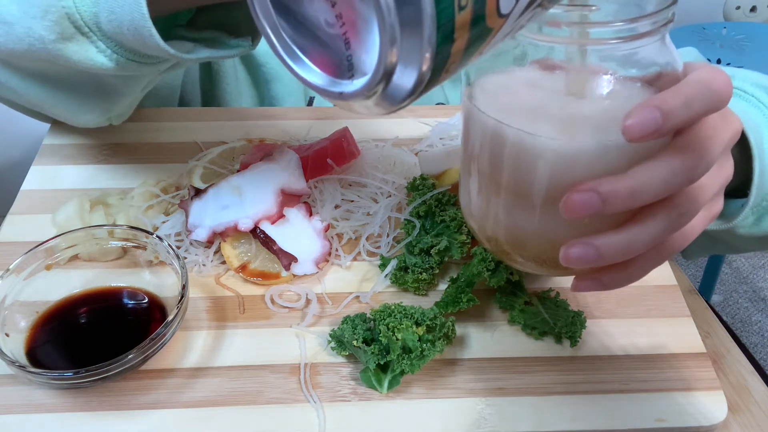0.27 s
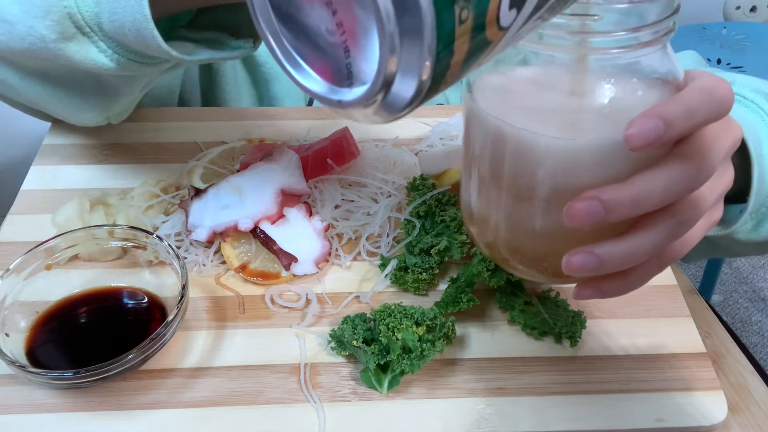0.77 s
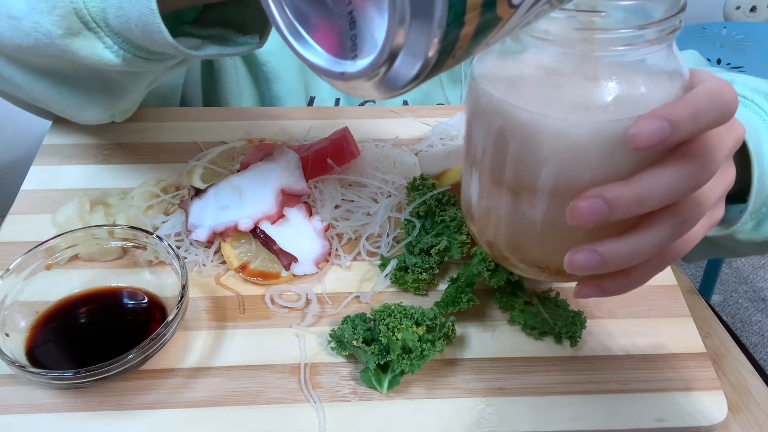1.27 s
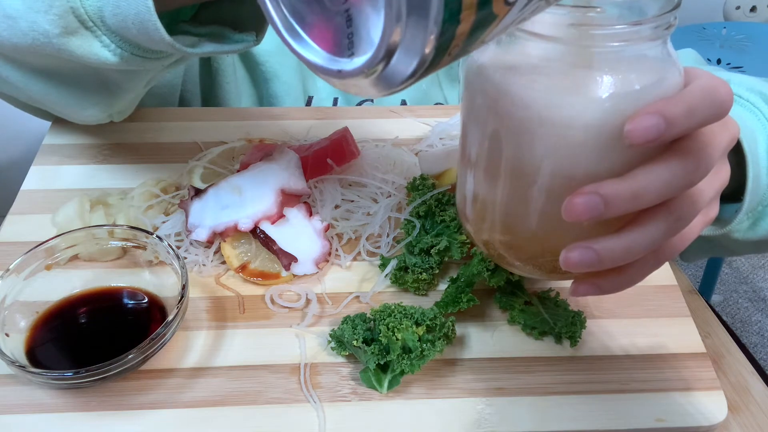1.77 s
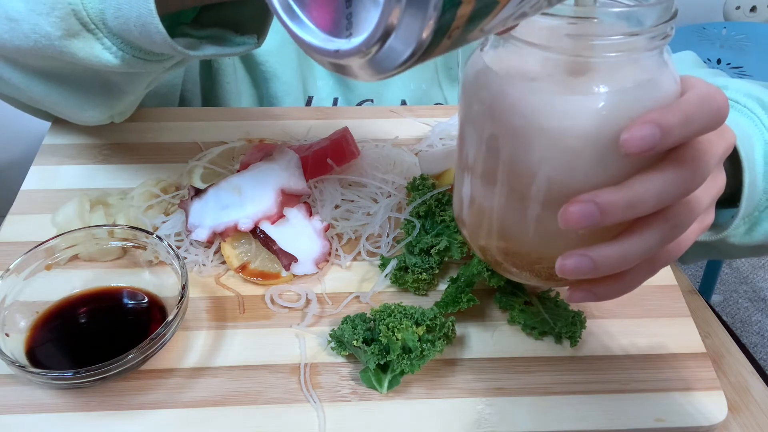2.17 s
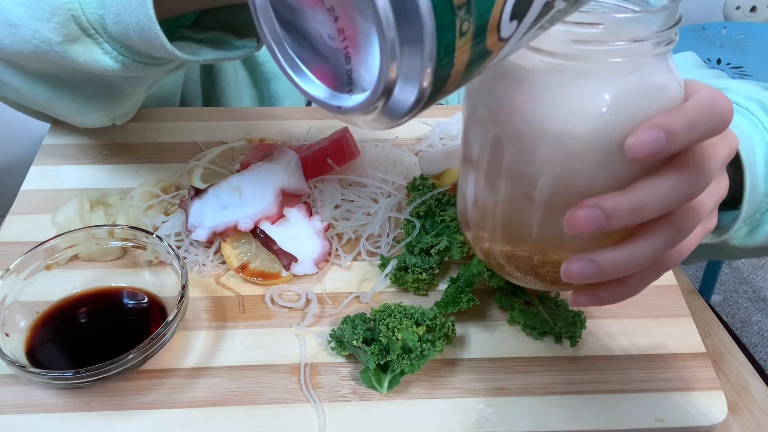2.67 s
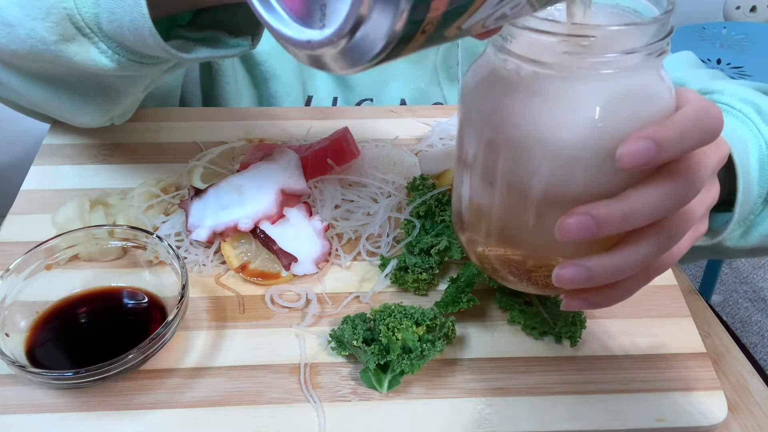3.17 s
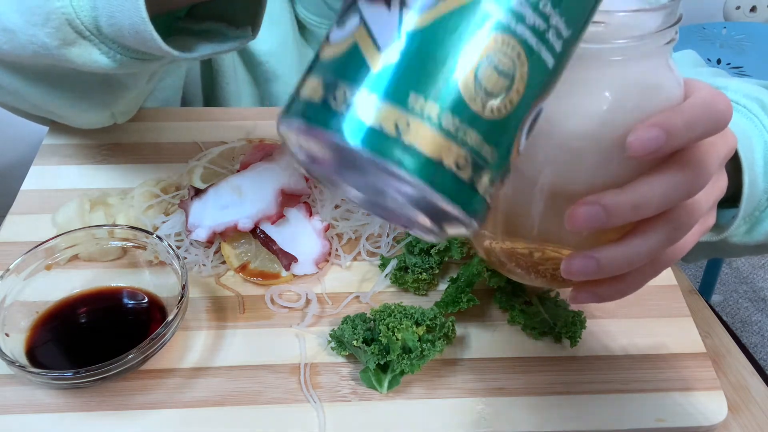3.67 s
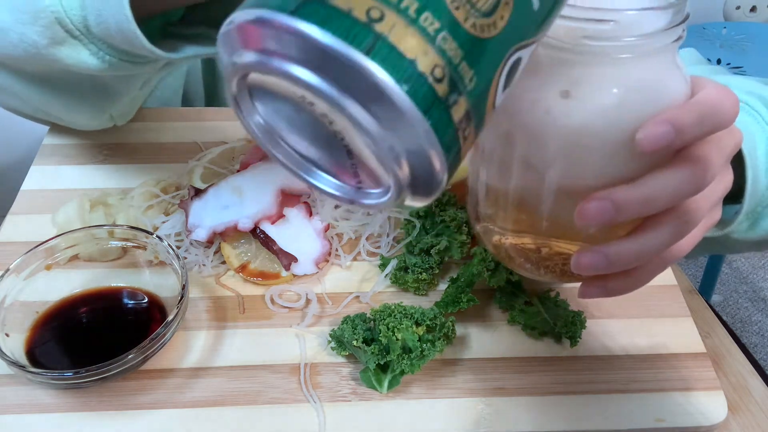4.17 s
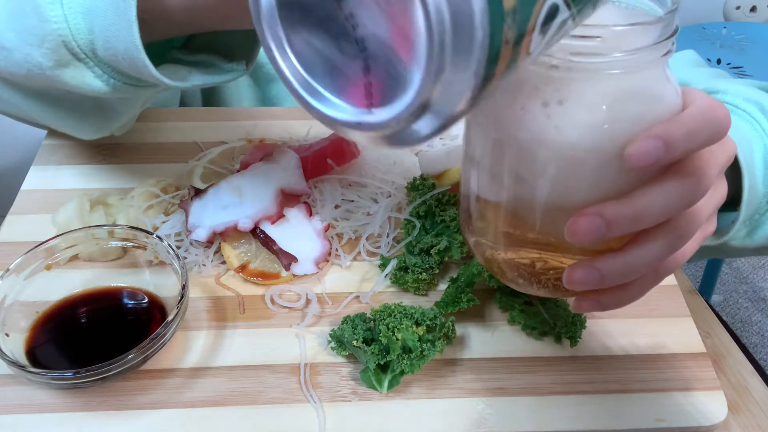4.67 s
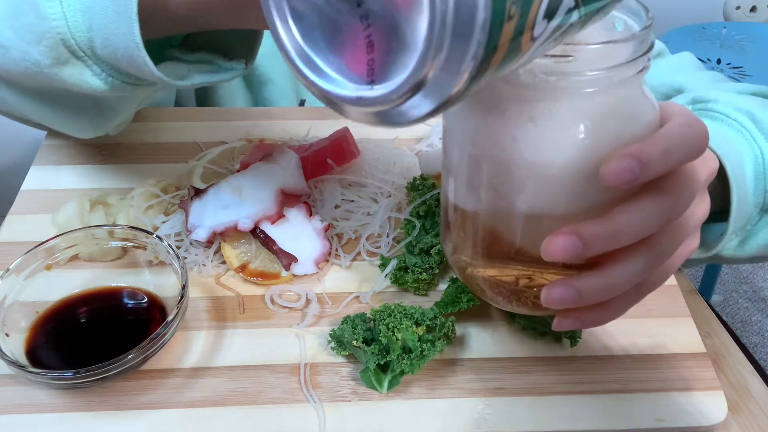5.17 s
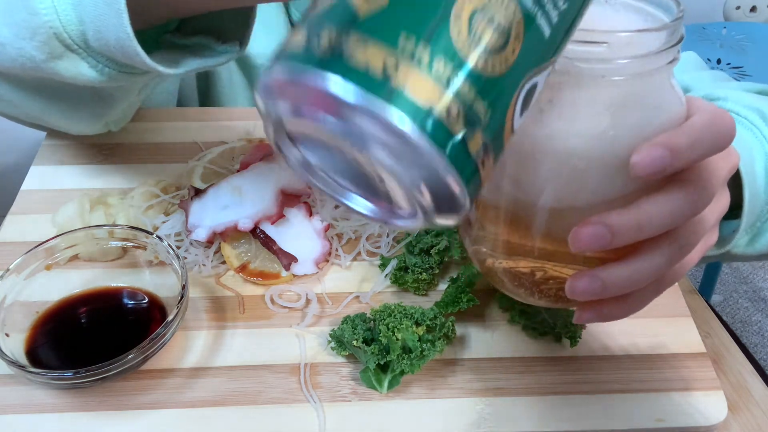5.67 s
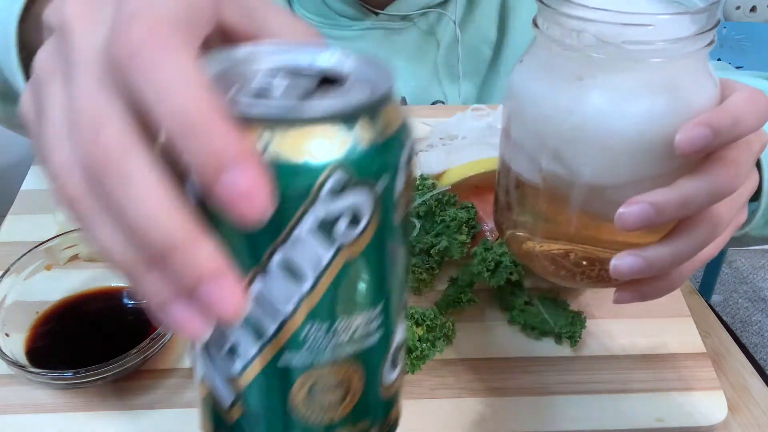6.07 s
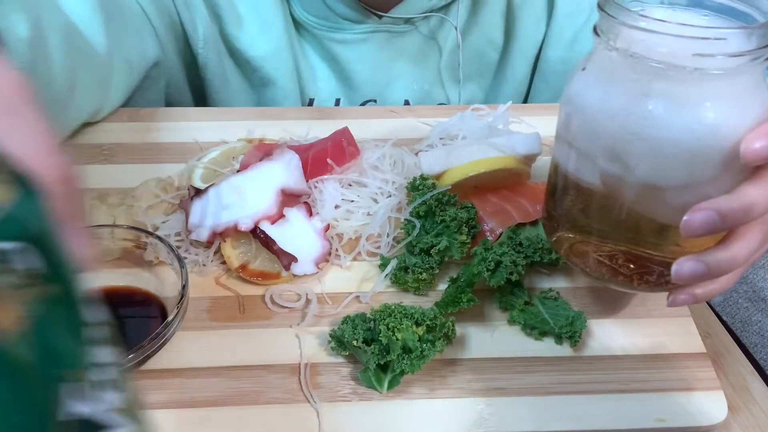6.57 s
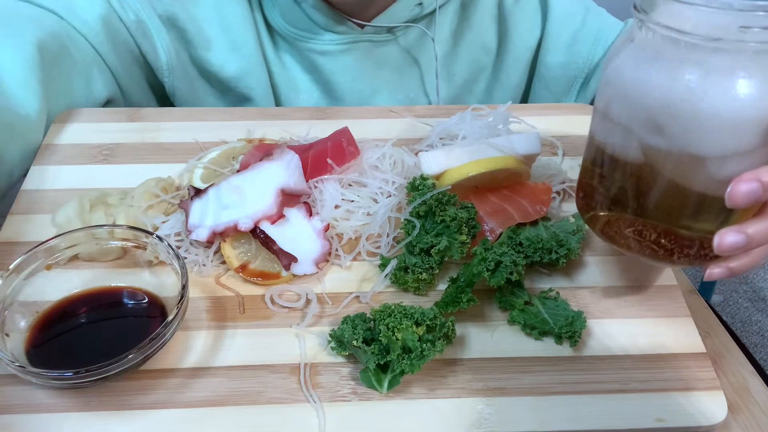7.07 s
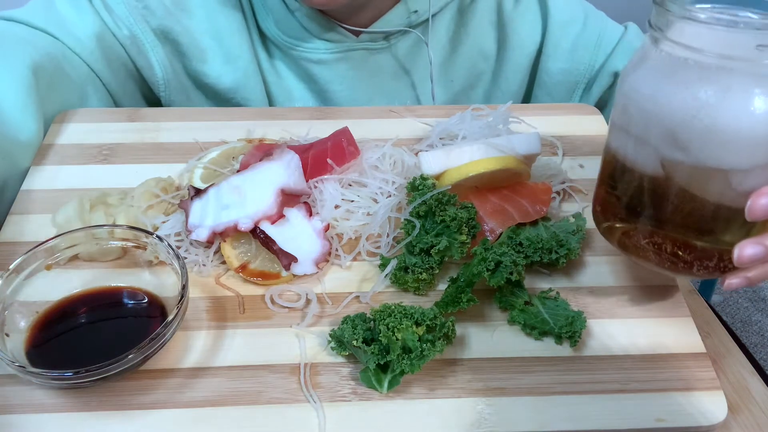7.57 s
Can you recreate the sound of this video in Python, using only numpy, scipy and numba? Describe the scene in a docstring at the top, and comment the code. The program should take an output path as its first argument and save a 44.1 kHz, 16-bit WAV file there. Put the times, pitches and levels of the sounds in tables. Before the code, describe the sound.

A fizzy drink is already pouring from a can into a glass jar, heard close up in a small, quiet room. For the first 2.5 seconds, big bubbles plop and ice clinks lightly against the glass, while the splashing stream rises steadily in pitch. A soft, prickly fizz runs throughout, growing mellower as foam builds. The can bumps dully against the jar at about 2.5 and 3.1 seconds, with a few small drips, and the stream thins out. At about 4.3 seconds the can is tipped again, giving a quick cluster of hollow glugs, soft bumps and thin metal ticks, then two weaker glugs near 4.9 seconds. Faint drips, ticks and one small ice tap follow before 6 seconds. The foam keeps fizzing gently until, at about 7.7 seconds, the can is set down on the table with a loud, low thud.

```python
"""Fizzy drink over ice

A can is poured into a glass jar close by. Big bubbles plop and ice clinks while the air above the
rising foam rings higher and higher; the foam fizzes on. The can glugs when it is tipped a second
time, and is finally set down on the table with a thud."""
import sys
import numpy as np
from scipy import signal
from scipy.fft import rfft, irfft, next_fast_len
from scipy.io import wavfile
from scipy.ndimage import uniform_filter1d
from numba import njit

SR = 44100
rng = np.random.default_rng(int(sys.argv[2]) if len(sys.argv) > 2 else 0)


def output_pcm(signal):
    """Save a mono or channel-first signal as 16-bit PCM at the path in sys.argv[1].

    Samples are clipped to [-1, 1] before scaling.
    """
    pcm = np.clip(np.atleast_2d(signal).T, -1, 1) * 32767
    wavfile.write(sys.argv[1], SR, np.round(pcm).astype(np.int16))


N = 345744
TIME = np.arange(N) / SR
AGE = TIME[:SR // 2]   # seconds into a one-shot


def from_db(db):
    """Decibels to gain."""
    return 10 ** (np.asarray(db) / 20)


def rms_one(x):
    """Scale to unit power."""
    return x / np.sqrt(np.mean(x ** 2) + 1e-20)


def automation(rows):
    """Breakpoints to one curve per column, at every sample."""
    times, *columns = np.transpose(rows)
    return [np.interp(TIME, times, column) for column in columns]


def butter(x, hz, kind, order=2):
    """Causal Butterworth filter."""
    return signal.sosfilt(signal.butter(order, np.clip(hz, 10, .45 * SR), kind, fs=SR, output="sos"), x)


def eq(x, curve):
    """Shape a sound with a curve of (f/Hz, gain/dB) points."""
    hz, db = np.transpose(curve)
    size = next_fast_len(N)
    bins = np.maximum(np.arange(size // 2 + 1) * SR / size, 1)
    gain = from_db(np.interp(np.log(bins), np.log(hz), db))
    return irfft(rfft(x, size) * gain, size)[:N]


def drift(per_s):
    """A random modulator of unit power."""
    knots = rng.standard_normal(8000)
    return rms_one(np.interp(TIME * per_s, np.arange(len(knots)), knots))


def grains(per_s, spread_db):
    """Random clicks, many small and a few large."""
    born = rng.random(N) < per_s / SR
    sizes = from_db(spread_db * np.minimum(rng.exponential(1, N), 5))
    return rms_one(born * sizes * rng.choice([-1, 1], N))


def envelope(attack, t60):
    """A smooth rise, then an exponential tail; both times in seconds."""
    rise = np.sin(np.pi / 2 * np.minimum(AGE / attack, 1)) ** 2
    return rise * np.exp(-np.log(1000) * np.maximum(AGE - attack, 0) / t60)


def ring(hz, t60, attack):
    """One struck mode: a decaying sine."""
    return envelope(attack, t60) * np.sin(2 * np.pi * hz * AGE)


def add(track, t, sound):
    """Mix a one-shot into a track at t seconds."""
    at = int(np.clip(round(t * SR), 0, N - 1))
    track[at:at + len(sound)] += sound[:N - at]


@njit
def resonate(x, hz, width):
    """A swept resonator that keeps the power of white noise."""
    out = np.zeros(len(x))
    for i in range(2, len(x)):
        r = np.exp(-np.pi * width[i] / SR)
        drive = np.sqrt((1 - r * r) / 2) * (x[i] - x[i - 2])
        out[i] = drive + 2 * r * np.cos(2 * np.pi * hz[i] / SR) * out[i - 1] - r * r * out[i - 2]
    return out


def air_ring(x, hz, width_hz, skirt):
    """Enclosed air resonating; a second pass, skirt times wider, steepens the flanks."""
    width = width_hz * np.ones(N)
    return rms_one(resonate(resonate(x, hz, width), hz, skirt * width))


# Room tone EQ: f/Hz, gain/dB
RUMBLE_EQ = [(20, -12), (40, -5), (56, 6.5), (80, -8), (125, -0.5), (200, 0), (400, -8), (1000, -4.5),
             (4000, -41)]


def rumble():
    """A faint bed of low room noise."""
    return from_db(-63) * rms_one(eq(rng.standard_normal(N), RUMBLE_EQ))


def reverb(x, t60=0.14, predelay_s=.007, dull_hz=2600):
    """Scattered, dulled echoes from the table top and the walls of a small, soft room."""
    echoes = rng.standard_normal(len(AGE)) * np.exp(-np.log(1000) * AGE / t60) * (AGE > predelay_s)
    wet = signal.fftconvolve(x, echoes / np.linalg.norm(echoes))[:N]
    return butter(wet, dull_hz, "low", order=1)


def prickle(pitches=24, t60_cycles=70):
    """The tiniest bubbles ping out of the fizz one by one."""
    out = np.zeros(N)
    for hz in np.geomspace(5000, 15200, pitches):
        r = from_db(-60 * hz / (t60_cycles * SR))
        poles = [1, -2 * r * np.cos(2 * np.pi * hz / SR), r * r]
        pings = signal.lfilter([1], poles, grains(per_s=12, spread_db=3) + 1e-18)
        out += hz * rms_one(pings)
    return rms_one(out)


# Hiss of bursting bubbles: t/s, level/dB
FIZZ_LEVEL = [(0.0, -51), (0.37, -50.5), (0.59, -53.5), (1.09, -53.5), (1.46, -50), (2.53, -48.5),
              (4.11, -52.5), (4.65, -49.5), (5.31, -51), (5.59, -49), (6.09, -52.5), (6.7, -53),
              (7.21, -56), (7.84, -55.5)]
# Crossfade from open liquid to a head of foam: t/s, foam share/0-1
FOAM_SHARE = [(0, 0), (1.5, 0.24), (2.6, 0.11), (3.2, 0.64), (3.8, 0.98), (7.84, 0.79)]
# EQs for fizz on open liquid, fizz in foam and the foam's low body: f/Hz, gain/dB
LIQUID_EQ = [(100, -5), (250, 0.5), (400, -7.5), (520, -3.5), (900, 3.5), (1800, -5), (2500, -1), (3150, 3),
             (3750, -1), (4300, 2), (5100, -1.5), (6800, -1), (7400, 0), (9300, -7.5), (15500, -14.5)]
FOAM_EQ = [(440, -22), (750, -20.5), (1080, -3.5), (1340, -9), (1780, -1.5), (2230, -2), (2500, -1.5),
           (2700, -3.5), (4260, -4.5), (5410, -9.5), (7070, -8), (10200, -20), (11600, -19), (15500, -26)]
BODY_EQ = [(100, -5.5), (260, -6), (400, -3.5), (520, -7.5), (700, -9.5), (900, -1), (1300, -38)]


def fizz(mean_spray_db=-59.5, spray_follows=0.71):
    """Thousands of tiny bursts a second, mellower under foam; the finest spray follows the hiss."""
    hiss_db, = automation(FIZZ_LEVEL)
    head, = automation(FOAM_SHARE)
    spray_db = mean_spray_db + spray_follows * (hiss_db - hiss_db.mean())
    bursts = grains(per_s=9000, spread_db=2.5) + .5 * rng.standard_normal(N) + 0.28 * prickle()
    bursts *= from_db(0.5 * drift(40))
    liquid, foam = eq(bursts, LIQUID_EQ), eq(bursts, FOAM_EQ)
    # equal treble level on both sides of the crossfade
    liquid, foam = [x / np.std(butter(x, [3800, 8000], "band", order=4)) for x in (liquid, foam)]
    blend = (1 - head) * liquid + head * foam
    spray = eq(blend, [(8000, -40), (9300, 0)])
    body = head * from_db(-12) * rms_one(eq(grains(per_s=2300, spread_db=3.5), BODY_EQ))
    return from_db(hiss_db) * (blend - spray + body) + from_db(spray_db) * rms_one(spray)


# Dull bumps of the can on the jar: t/s, level/dB
CAN_BUMPS = [(2.481, -33), (2.496, -40), (3.122, -29), (4.345, -35.5), (4.466, -33.5)]
# Metal ticking under the grip: t/s, level/dB
GRIP_TICKS = [(4.346, -32), (4.351, -38), (4.362, -47), (5.18, -46), (5.238, -48), (5.387, -46)]


def handling():
    """Soft bumps and thin metal ticks from the can in the hand."""
    out = np.zeros(N)
    bump = ring(196, t60=0.013, attack=0.0022) + 0.64 * ring(240, t60=0.0071, attack=0.001)
    for t, db in CAN_BUMPS:
        add(out, t, from_db(db) * bump)
    for t, db in GRIP_TICKS:
        tick = butter(rng.standard_normal(len(AGE)), [12200, 13700], "band") * np.exp(-AGE / .003)
        add(out, t, from_db(db + 3) * tick)
    return out


# The air inside the can: t/s, f/Hz, hum level/dB
CAN_AIR = [(0, 406, -67.5), (2.7, 392, -66.5), (3.25, 303, -63), (3.56, 398, -69), (3.8, 392, -77),
           (4.72, 386.6, -71), (4.83, 330, -69), (4.94, 335, -59), (5.12, 277, -70), (5.62, 418, -67),
           (6.4, 294, -86), (7.45, 243, -64.5)]


def can_hum():
    """The running drink stirs a faint hum in the hollow of the can."""
    hz, db = automation(CAN_AIR)
    return from_db(db) * air_ring(grains(per_s=600, spread_db=6), hz, width_hz=32, skirt=2.3)


# Air gulped into the can: t/s, level/dB, attack/s, t60/s, splash re gulp/dB
GULPS = [(4.347, -19, 0.013, 0.073, -1), (4.366, -12.5, 0.0089, 0.12, -15),
         (4.380, -17.5, 0.0052, 0.12, -22), (4.465, -23, 0.0048, 0.11, -13),
         (4.484, -28.5, 0.0039, 0.12, -24), (4.64, -49, 0.021, 0.17, -30),
         (4.859, -32.5, 0.0073, 0.067, -22), (4.908, -30.5, 0.0055, 0.11, -17.5)]
# The can's higher modes: f/Hz, level/dB, t60/s, attack/s
WALL_MODES = [(301, -3.5, 0.15, .02), (621, -6.5, .05, 0.011), (677, -10, 0.16, 0.019),
              (820, -14, 0.036, 0.013), (1005, -19, .11, 0.037), (1260, -36, .04, 0.01),
              (1660, -16.5, 0.026, 0.02), (2070, -23, .05, 0.014)]


def glugs():
    """Each gulp of air pumps up the ring of the can's hollow, and the drink slaps the wall."""
    splashes, pumped = np.zeros(N), np.zeros(N)
    wall = sum(from_db(db) * ring(hz, t60, attack) for hz, db, t60, attack in WALL_MODES)
    for t, db, attack, t60, splash_db in GULPS:
        slosh = butter(rng.standard_normal(len(AGE)), [450, 2000], "band")
        slap = from_db(-2.5) * slosh * envelope(attack=0.0066, t60=0.063)
        add(splashes, t, from_db(db + splash_db) * (wall + slap))
        add(pumped, t, from_db(db) * envelope(attack, t60))
    hollow_hz, _ = automation(CAN_AIR)
    return splashes + pumped * np.sin(2 * np.pi * np.cumsum(hollow_hz) / SR)


# The can touches down, rim first: t/s, level/dB
TOUCHDOWNS = [(7.6728, -12), (7.6746, 4), (7.6805, -9)]
# Table and can ringing together: f/Hz, level/dB, t60/s
THUD_MODES = [(104.8, -16, 0.22), (119, -34.5, 0.86), (139.7, -14.5, 0.12), (162, -12, 0.05),
              (191, -22.5, 0.18), (288.3, -23, 0.17), (420, -8, 0.034), (562, -6, 0.035), (684, -20, 0.03),
              (816, -20, 0.034), (980, -19, 0.039), (1390, -26, .03), (1704, -31, 0.033), (1810, -30, 0.02)]


def landing():
    """The can's base sets the table booming; the top radiates little below its first mode."""
    out = np.zeros(N)
    thud = sum(from_db(db) * ring(hz, t60, attack=0.59 / hz) for hz, db, t60 in THUD_MODES)
    for t, db in TOUCHDOWNS:
        add(out, t, from_db(db) * thud)
    return butter(out, 95, "high", order=4)


# Ice hitting the glass: t/s, contact/s, low ring/dB, middle ring/dB, high ring/dB
ICE_HITS = [(0.7475, 0.0016, -23, -21, -50), (0.8406, 0.0008, -39, -25.5, -27),
            (0.96, 0.0066, -20, -50, -54), (1.496, 0.0034, -22, -40, -48), (1.596, .001, -36, -33, -44),
            (2.0322, 0.0014, -27, -20.5, -30), (2.0393, 0.0011, -29.5, -21, -30),
            (2.2232, 0.00091, -37, -29, -43), (2.302, 0.0024, -29.5, -44, -48),
            (5.859, 0.00086, -31, -49, -48)]
# The three rings of a clink: f/Hz, t60/s
CLINK_MODES = [(3340, 0.03), (5580, 0.017), (6700, 0.013)]


def ice():
    """Ice taps the wet glass; each ring is a close, quickly damped pair of tones."""
    out = np.zeros(N)
    for t, contact, *levels in ICE_HITS:
        for db, (hz, t60) in zip(levels, CLINK_MODES):
            pitch = hz * (1 + 0.0079 * rng.standard_normal())
            pair = ring(pitch, t60, contact) + .8 * ring(pitch * 1.035, t60 / 2, contact)
            add(out, t, from_db(db - 6) * pair)
    return out


# The jar's air column under the stream: t/s, f/Hz, bandwidth/Hz, splash level/dB
JAR_AIR = [(0, 850, 188, -54.5), (.35, 854, 188, -50.5), (.65, 960, 190, -53), (1.1, 964, 215, -50),
           (1.27, 1050, 222, -44), (1.55, 1116, 241, -43.5), (1.8, 1140, 380, -46),
           (2.36, 1420, 463, -43.5), (2.52, 1670, 230, -39), (2.73, 1600, 353, -47.5),
           (2.9, 1730, 250, -47), (3.12, 1730, 330, -47), (3.28, 1960, 410, -51), (3.95, 2180, 446, -58),
           (4.6, 2220, 450, -50.5), (5.1, 2180, 450, -66), (6.42, 2460, 550, -52), (7.0, 1880, 505, -55)]
# Its second resonance: t/s, f/Hz, level re splash/dB
JAR_OVERTONE = [(0, 2500, -6), (1.0, 2610, -8.5), (1.1, 2670, -3), (1.4, 2810, -11.5), (1.8, 3020, -7),
                (2.4, 3400, -9.5), (3.1, 3480, -7), (3.7, 3670, -9), (7.84, 3820, -13)]


def stream():
    """Small splashes excite the air column, which shortens and rises in pitch as the jar fills."""
    hz, width, splash_db = automation(JAR_AIR)
    overtone_hz, overtone_db = automation(JAR_OVERTONE)
    splashes = grains(per_s=1500, spread_db=1) * from_db(1.9 * drift(60) + drift(16))
    column = air_ring(splashes, hz, width_hz=1.07 * width, skirt=1.8)
    overtone = air_ring(grains(per_s=7500, spread_db=2), overtone_hz, width_hz=330, skirt=4.1)
    # larger bubbles, lower in pitch
    burbles = air_ring(grains(per_s=60, spread_db=2), 0.68 * hz, width_hz=540, skirt=1.5)
    return from_db(splash_db) * (column + from_db(overtone_db) * overtone + from_db(-11) * burbles)


def jar_hz(t):
    """Pitch of the air in the jar at t seconds."""
    times, hz = np.transpose(JAR_AIR)[:2]
    return np.interp(t, times, hz)


def small_bubbles(count=12, start_s=1.1, end_s=2.0, db=-33, spread_db=3, spread_oct=0.22, thump_db=-8):
    """Plop cues for small bubbles scattered through the hard pour, around the jar's pitch."""
    times = start_s + (end_s - start_s) * (np.arange(count) + rng.random(count)) / count
    return [(t, db + spread_db * size, jar_hz(t) * 2 ** (spread_oct * detune), thump_db)
            for t, (size, detune) in zip(times, rng.standard_normal((count, 2)))]


# Big bubbles breaking: t/s, level/dB, f/Hz, thump re level/dB, first trailing bubble re level/dB
BIG_BUBBLES = [(0.05, -32, 610, 2, -14), (0.071, -29.5, 867, -26, -17), (.2205, -30, 830, -12, -14),
               (0.3233, -16, 847, -4.5, -4.5), (0.4281, -17.5, 860, -23, -4.5),
               (.577, -18.5, 1037, 7.5, -12), (0.6854, -9.5, 816, -10, -23),
               (0.7573, -29.5, 920, -5.5, -11), (0.8425, -6, 833, -11, -12.5), (.891, -26.5, 845, -22, -14),
               (.9655, -22.5, 975, -26, -20), (1.0374, -26.5, 960, -20, -20), (1.2142, -30, 507, -11, -1),
               (1.248, -19.5, 1090, -26, -3.5), (1.335, -31, 1360, -1, -12),
               (1.369, -18.5, 1120, -25, -6.5), (1.475, -21, 1020, -11, -7), (1.4991, -26.5, 1090, 3, -4),
               (1.533, -24, 1080, -13, -14), (1.5527, -11, 1070, -20, -19), (1.5988, -15, 1020, -10, -29),
               (1.716, -30.5, 740, 5.5, -23), (2.069, -29, 1184, -5.5, -20), (2.1155, -29.5, 1100, -5, -20),
               (2.496, -23, 1744, -11.5, -13)]


def big_bubbles(trailing=2, gap_s=.0125, loss_db=5, trail_thump_db=-9):
    """Plop cues for each big bubble and the ever weaker ones that trail it at the jar's pitch."""
    cues = []
    for t, db, hz, thump_db, trail_db in BIG_BUBBLES:
        cues.append((t, db, hz, thump_db))
        for k in range(trailing):
            cues.append((t + gap_s * (k + 1), db + trail_db - loss_db * k, jar_hz(t), trail_thump_db))
    return cues


# Single drops off the can's lip: t/s, level/dB, f/Hz, thump re level/dB
LIP_DROPS = [(2.526, -39, 990, 5), (2.646, -36, 1020, -6), (2.79, -34, 1120, -8), (5.215, -41, 850, -20),
             (5.385, -43, 780, -13), (5.858, -43, 940, -8)]


def plops(lead_s=0.00148, thump_hz=360):
    """Each bubble or drop gives a few cycles of the jar's air and a dull thump below them."""
    out = np.zeros(N)
    for t, db, hz, thump_db in big_bubbles() + small_bubbles() + LIP_DROPS:
        stretch = np.interp(db, [-19, -10], [1.57, 1])   # weak ones open more slowly
        tone = ring(hz, t60=0.019, attack=0.0018 * stretch)
        thump = from_db(thump_db) * ring(thump_hz, t60=0.0041 * stretch, attack=0.0012 * stretch)
        add(out, t - lead_s * stretch, from_db(db) * (tone + thump))
    mellow = butter(out, 2300, "low", order=4)
    return butter(mellow, 210, "high", order=3)


def scene():
    """A mono mix, all within arm's reach; only the one-shots feed the reverb."""
    hits = plops() + ice() + glugs() + handling() + landing()
    return (hits + from_db(-13.5) * reverb(hits) + stream() + can_hum() + fizz() + rumble())[None]


def duck(x, threshold_db=-14, slope=0.65, release_db_per_s=35):
    """Gain control: a loud sound turns everything down for a moment."""
    level_db = 10 * np.log10(np.maximum(uniform_filter1d(x ** 2, size=400), 1e-12))
    cut_db = slope * np.maximum(level_db - threshold_db, 0)
    release_db = release_db_per_s * TIME
    held_db = np.maximum.accumulate(cut_db + release_db) - release_db
    return x * from_db(-uniform_filter1d(held_db, size=130))


def record(dry, low_cut_hz=56, high_cut_hz=15900):
    """The microphone drops the deepest bass, the gain ducks under loud knocks, and the top is cut."""
    ducked = duck(butter(dry, low_cut_hz, "high"))
    return signal.sosfilt(signal.ellip(12, .1, 80, high_cut_hz, fs=SR, output="sos"), ducked)


dry = scene()
out = record(dry)
output_pcm(out)
```